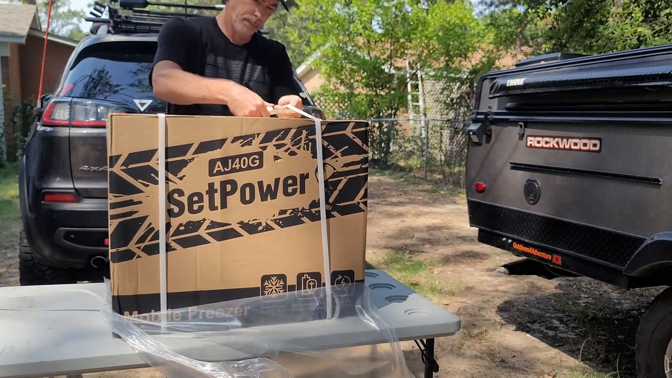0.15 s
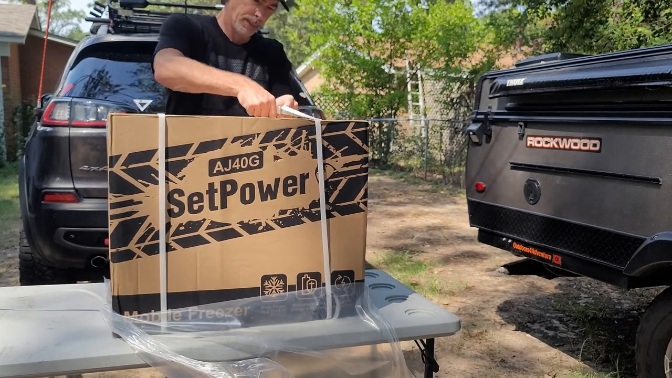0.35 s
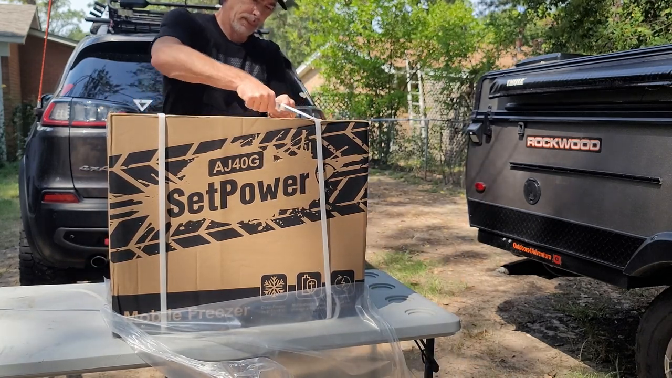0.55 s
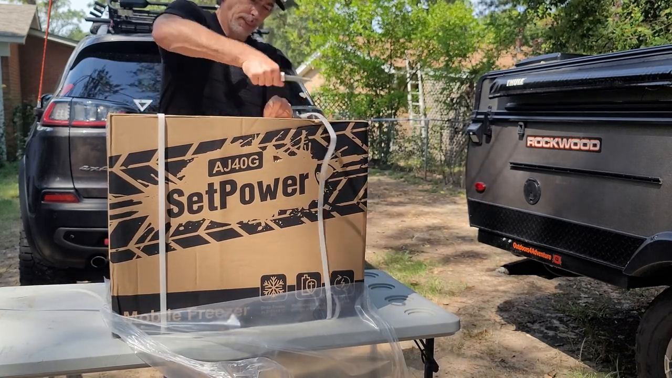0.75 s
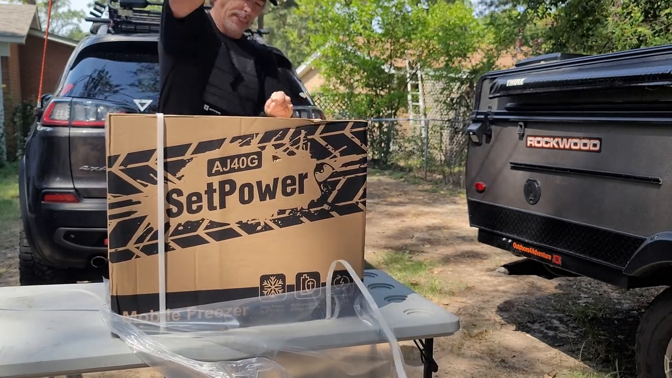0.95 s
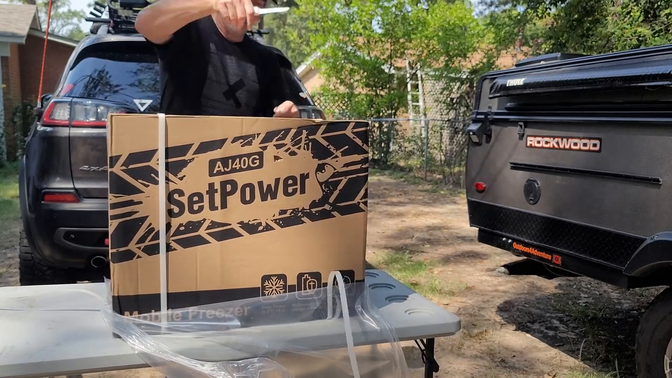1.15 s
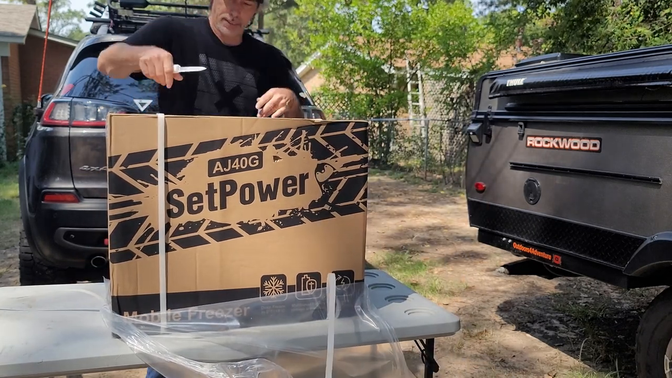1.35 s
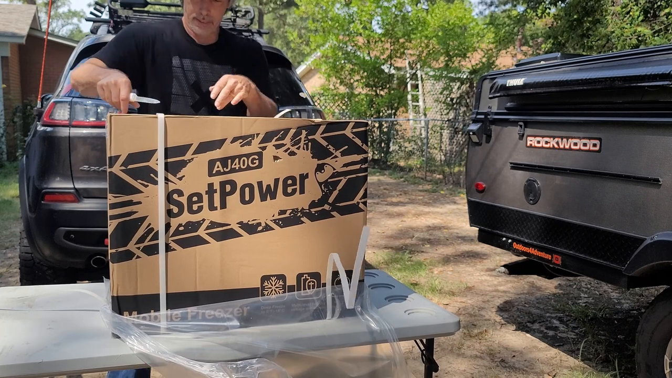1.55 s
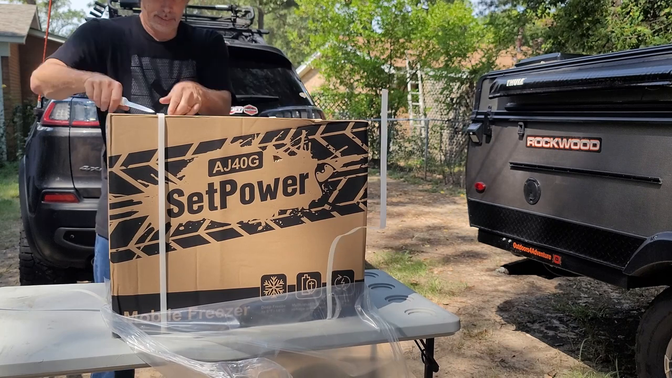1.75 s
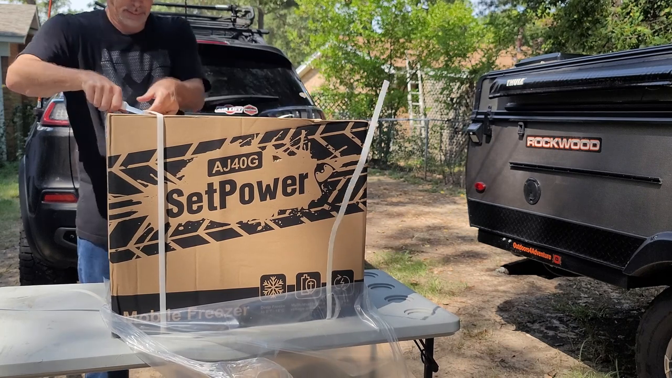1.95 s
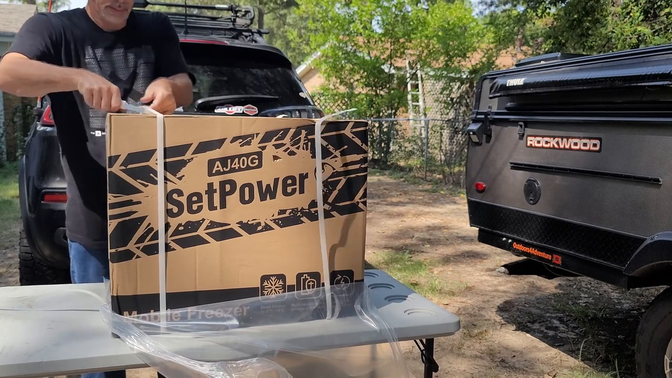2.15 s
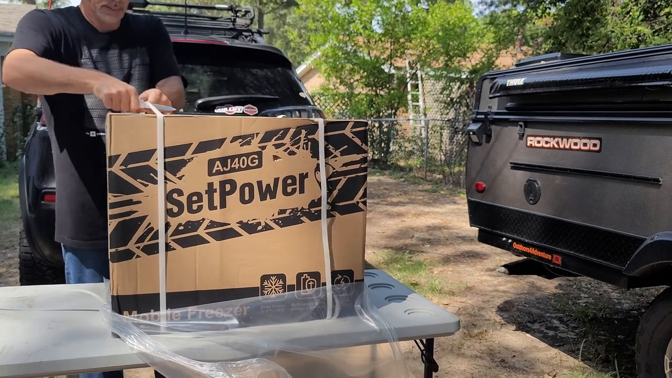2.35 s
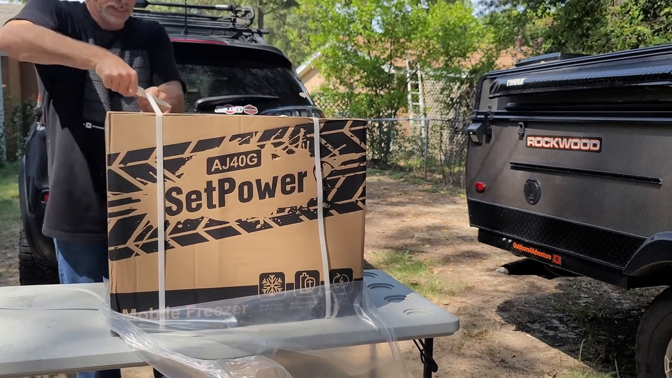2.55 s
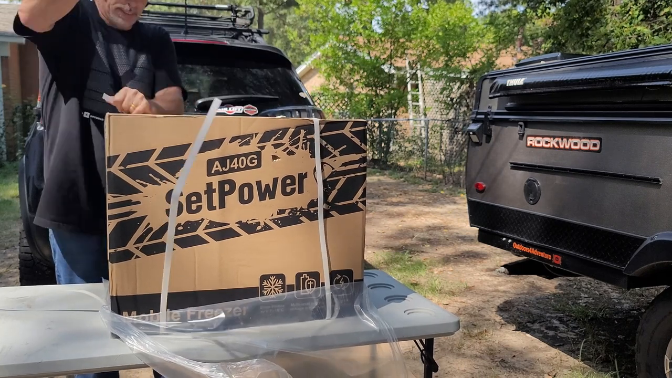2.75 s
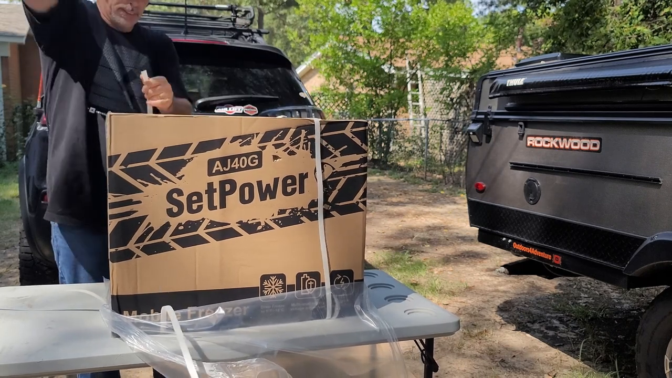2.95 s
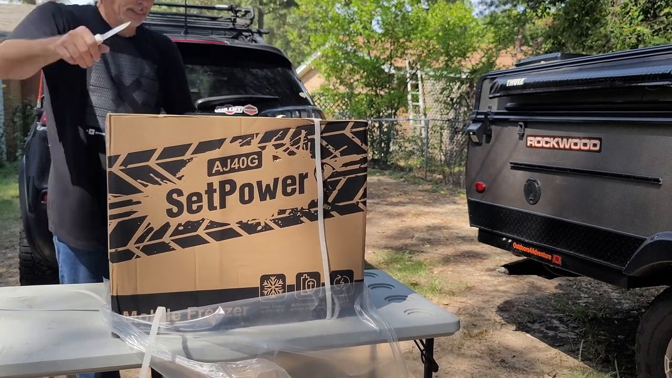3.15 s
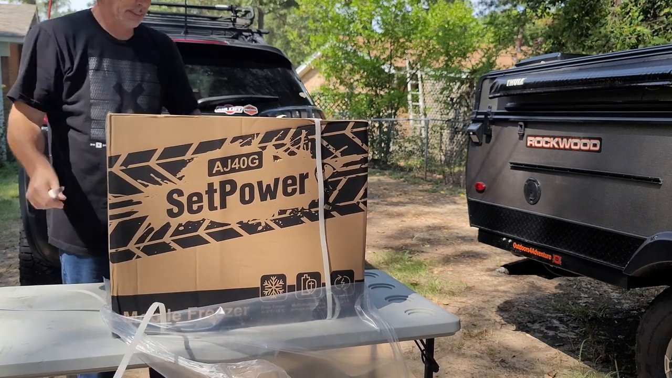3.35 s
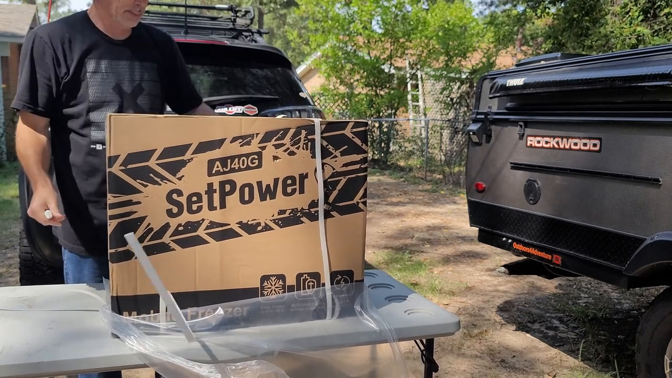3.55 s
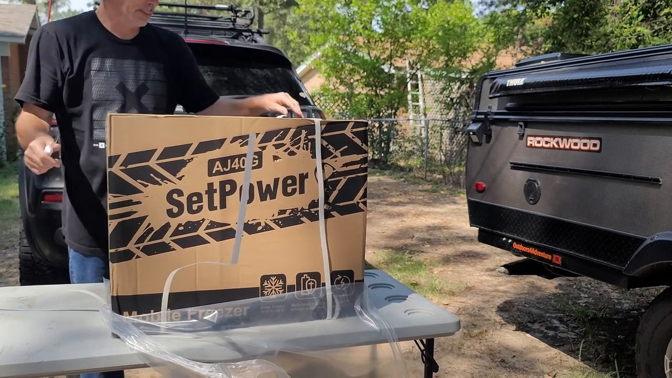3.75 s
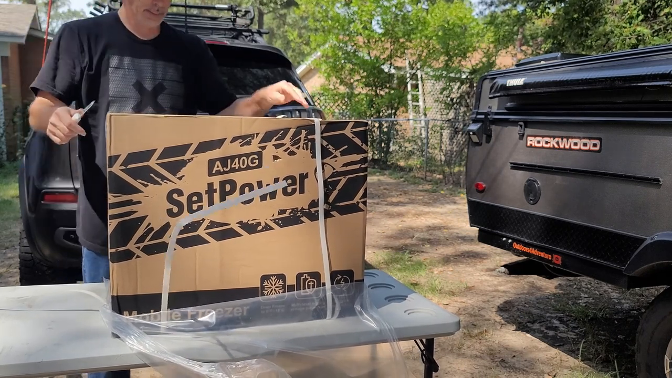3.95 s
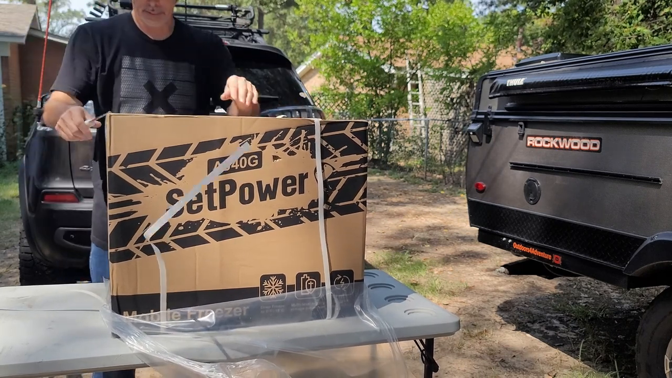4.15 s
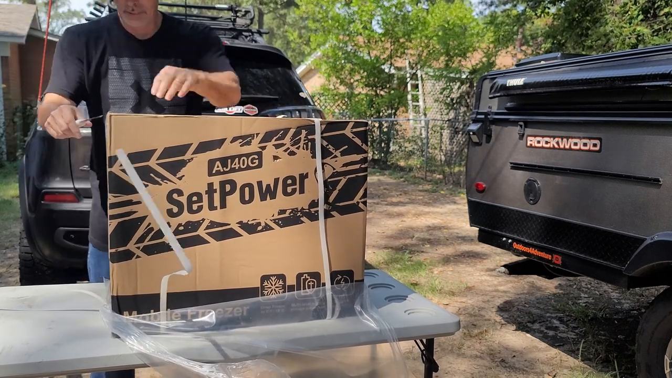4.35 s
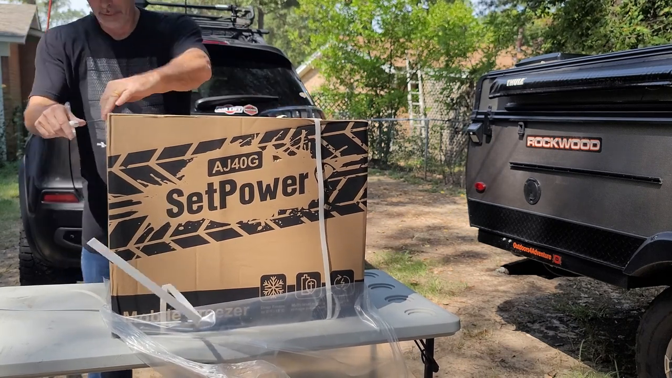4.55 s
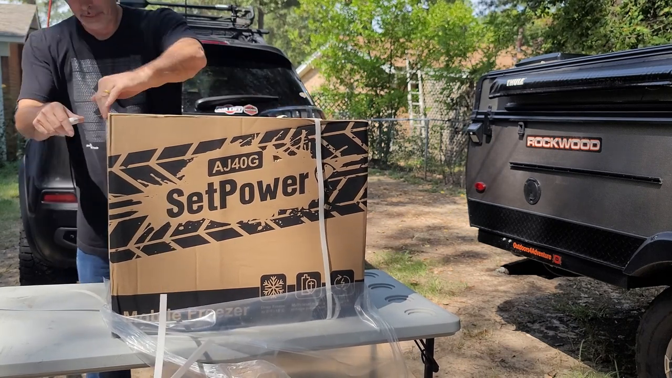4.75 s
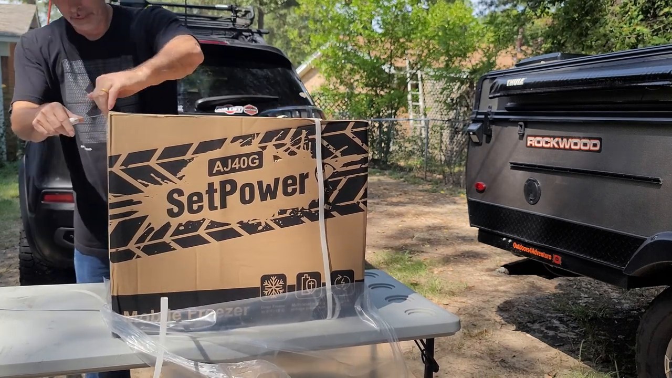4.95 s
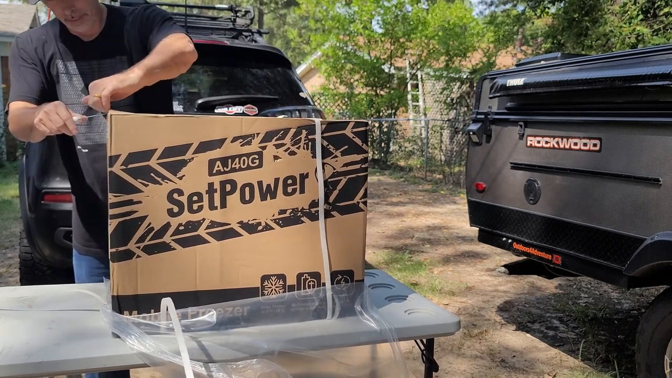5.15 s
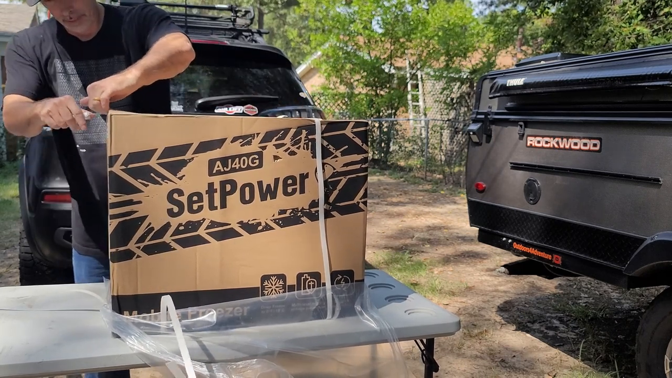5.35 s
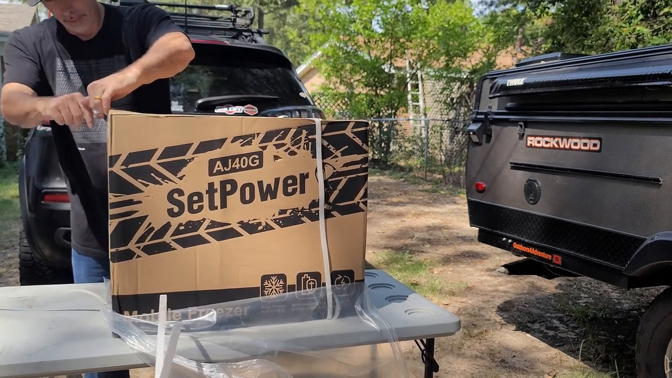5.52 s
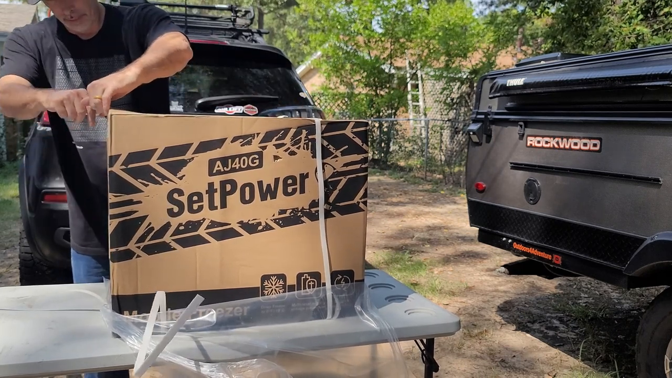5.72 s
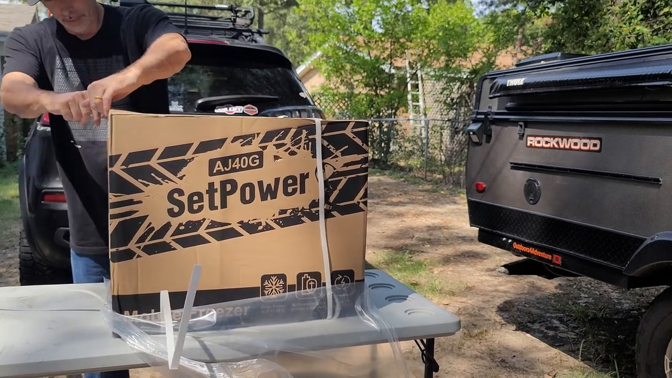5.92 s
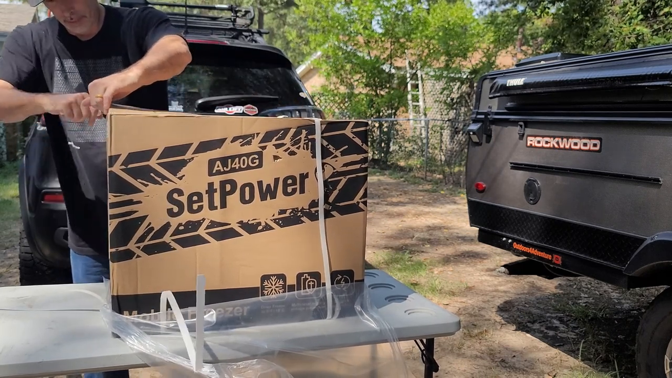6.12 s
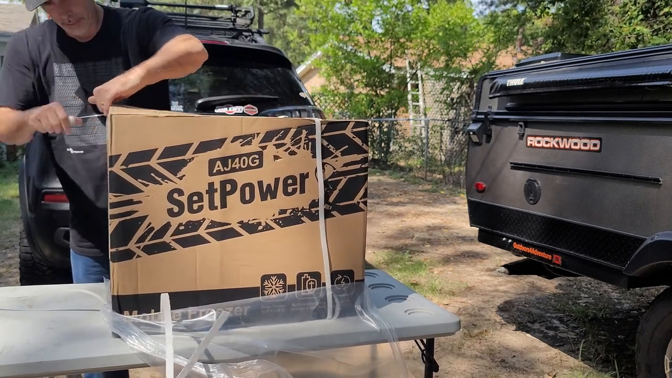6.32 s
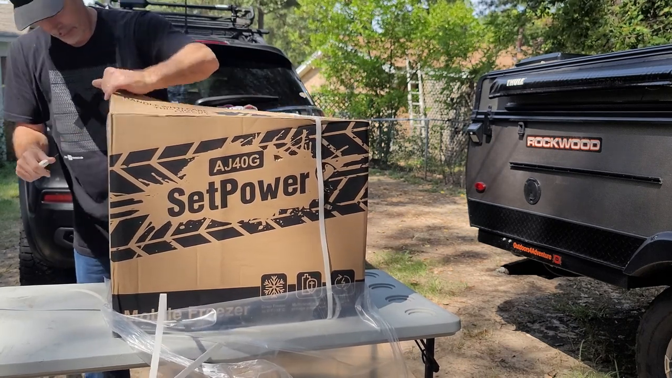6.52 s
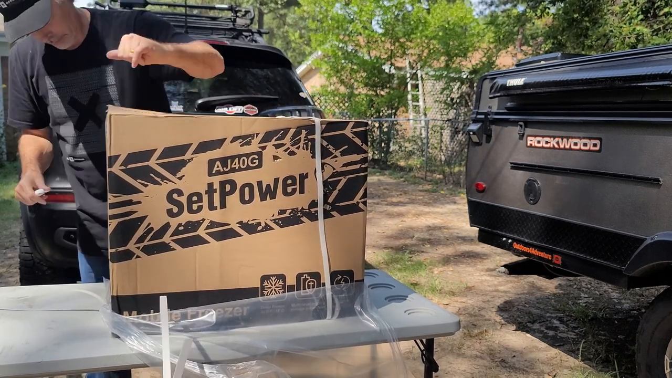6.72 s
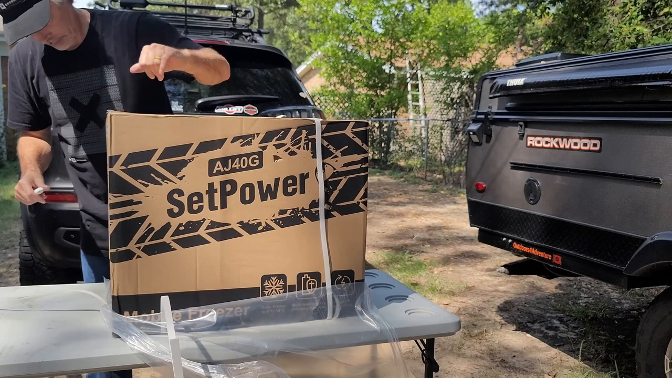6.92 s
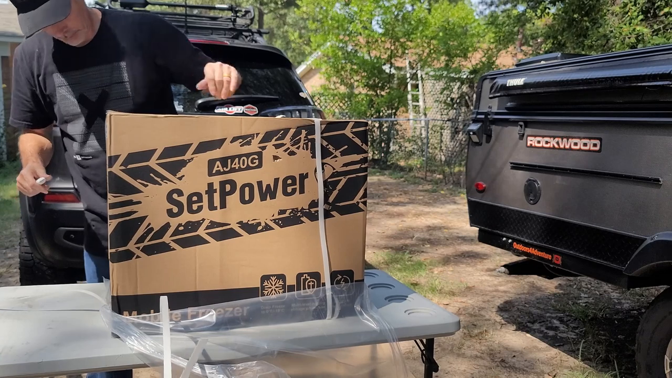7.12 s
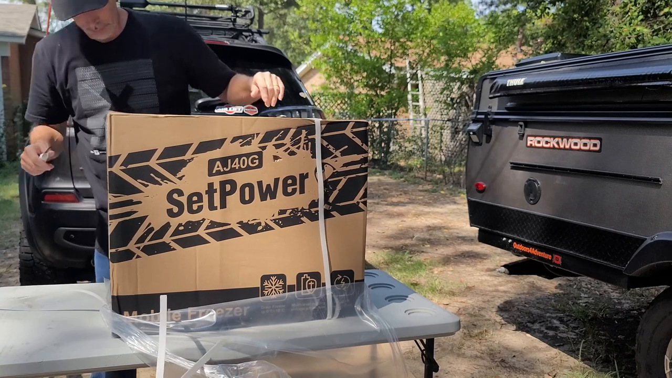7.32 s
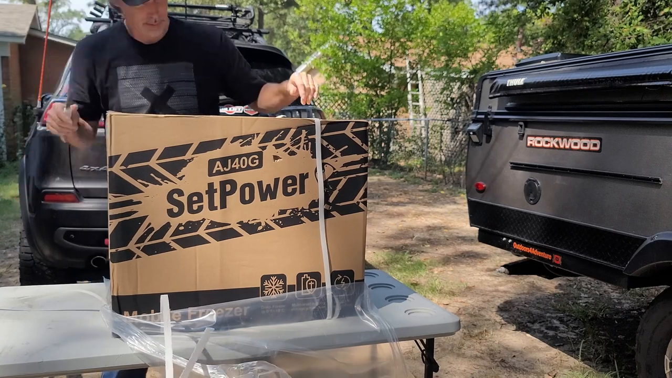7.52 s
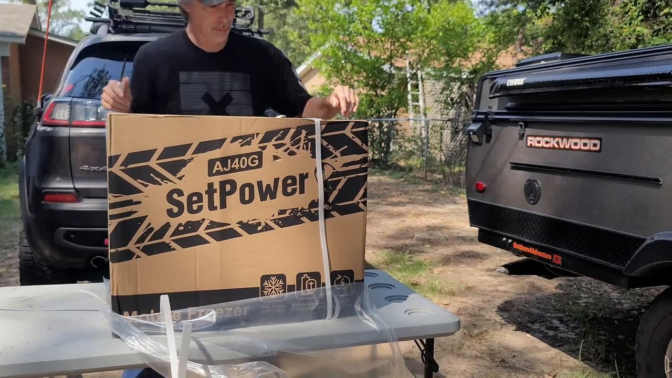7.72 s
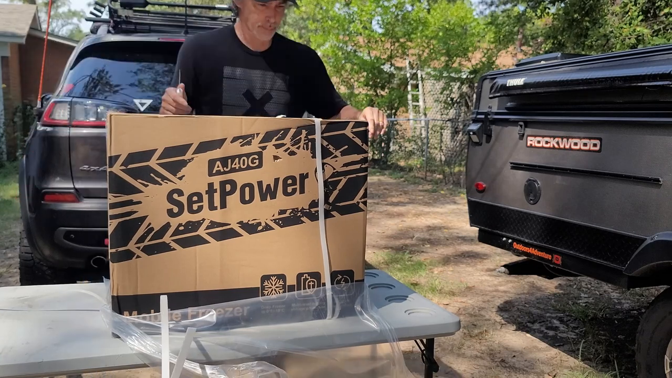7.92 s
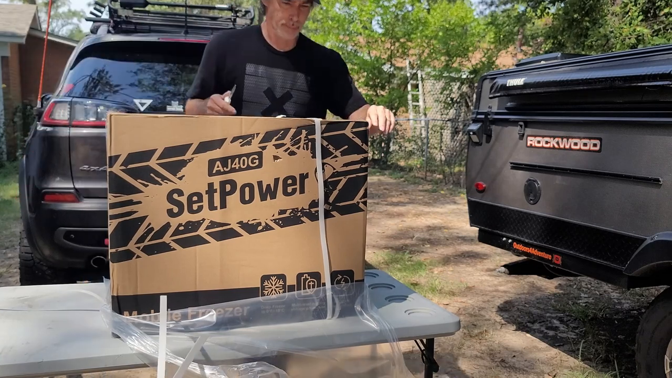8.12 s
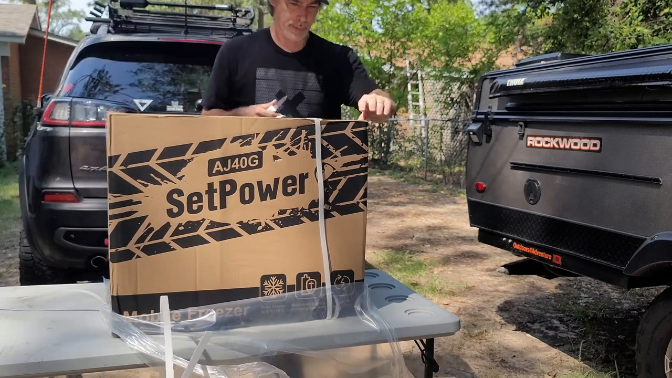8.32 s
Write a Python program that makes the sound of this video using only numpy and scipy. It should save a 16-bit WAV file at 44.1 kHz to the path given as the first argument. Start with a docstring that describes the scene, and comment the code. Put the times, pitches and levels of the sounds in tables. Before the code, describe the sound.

Close stereo view of a box in a wooded yard: knife clicks, a loud plastic crack with fluttering slaps on cardboard, sliding scrapes, then an even harder crack. A quiet stretch of light swishing leads to a dragged strap's short groan, rapid knocks and a low thump as the box rocks. Soft handling ends it. A steady beating motor hum and sparse bird chirps lie behind, with faint scattered echoes.

```python
"""A wooded yard, where two taut plastic straps are cut off a cardboard box on a table.
The knife nicks each strap; it snaps as a burst of noise and whips the box in slaps that ring panel modes.
Later the loose strap is dragged, as scraping noise and a stick-slip groan, and tugged free; the box rocks.
Two distant motors hum as wavering sines that beat together, over filtered noise for rumble and leaf hiss.
Small birds call from the trees as gliding sines, and scattered echoes fill the yard."""
import sys
import numpy as np
from scipy import signal
from scipy.fft import rfft, irfft
from scipy.io import wavfile
from scipy.ndimage import uniform_filter1d

SR = 44100
rng = np.random.default_rng(int(sys.argv[2]) if len(sys.argv) > 2 else 0)


def put_to_file(sound):
    """Save the sound as 16-bit audio at rate SR, in the file named by the first command-line argument."""
    columns = np.atleast_2d(sound).T  # one column per channel
    safe = np.clip(columns, -1, 1)
    whole_steps = np.round(safe * 32767)
    wavfile.write(sys.argv[1], SR, whole_steps.astype(np.int16))


N = 373835
# Source levels below are set before the mix, where scene() tips the box 1 dB toward the right
# and lifts the birds 2 dB.


def amp(db):
    """Decibels to gain."""
    return 10 ** (np.asarray(db) / 20)


def evened(x):
    """Scales to rms 1."""
    return x / np.sqrt(np.mean(x ** 2) + 1e-20)


def read(points, hz):
    """Reads a table on a log-frequency axis."""
    f, value = np.transpose(points)
    return np.interp(np.log(hz + 1), np.log(f + 1), value)


def add(mix, s, sound):
    """Adds a sound into the mix at time s."""
    part = mix[:, max(round(s * SR), 0):][:, :sound.shape[-1]]
    part += sound[..., :part.shape[1]]


def coloured(x, spectrum, tilt_db=0):
    """Minimum-phase filter of unit energy with the given spectrum, tilted per octave about 3.7 kHz."""
    hz = np.fft.rfftfreq(2048, 1 / SR)
    log_gain = np.log(amp(read(spectrum, hz) + tilt_db * np.log2((hz + 300) / 4000)))
    mirrored = np.r_[log_gain, log_gain[-2:0:-1]]
    # the Hilbert transform supplies the phase that makes the filter causal
    response = np.exp(np.conj(signal.hilbert(mirrored)))
    taps = np.fft.ifft(response).real
    taps /= np.linalg.norm(taps)
    return signal.fftconvolve(x, taps[None], axes=1)[:, :x.shape[1]]


def ports(size, apart):
    """Noise at two microphone ports; apart is how much each hears on its own."""
    z = rng.standard_normal((3, size))
    return (z[0] + apart * z[1:]) / np.hypot(1, apart)


def placed(pair, lead_ms):
    """The sound reaches the left port earlier than the right; a negative lead puts the right first."""
    size = pair.shape[1]
    turn = np.exp(-2j * np.pi * np.fft.rfftfreq(size, 1 / SR) * lead_ms / 1000)
    return np.array([pair[0], irfft(rfft(pair[1]) * turn, size)])


def drift(size, rate_hz):
    """Smooth chance of rms 1, made of random points joined by straight lines."""
    knots = rng.standard_normal(size // 8 + 2)
    return np.interp(np.arange(size) * rate_hz / SR, np.arange(len(knots)), knots) * np.sqrt(3 / 2)


# Colour of the yard's air: f/Hz, relative level/dB per Hz
AIR_SPECTRUM = [(12, -24), (33, -3), (70, 3.5), (180, -4.5), (280, -13.5), (500, -21.5), (950, -22.5),
                (1400, -29.5), (4400, -33.5), (5500, -38.5), (7000, -39.5), (8000, -51.5), (10000, -56.5),
                (15000, -51)]
# Left-right likeness of the air: f/Hz, correlation [-1 to 1]
AIR_LIKENESS = [(60, 0.93), (130, 0.9), (290, .78), (640, -0.05), (1400, -.15), (3000, 0.2), (15000, -0.16)]
AIR_DB = -67  # rms of the left-right average between 500 and 6000 Hz


def air(patch_db=2.0, swell_db=0.07):
    """Far rumble and leaf hiss: noise shaped by spectrum, drifting in patches of time and pitch."""
    frames, hz = N // 512 + 5, np.fft.rfftfreq(2048, 1 / SR)
    a, b, c, d, patches = rng.standard_normal((frames, len(hz), 5)).T
    patches = uniform_filter1d(patches, size=16, axis=0)
    patches = evened(uniform_filter1d(patches, size=10, axis=1))
    same = np.clip(read(AIR_LIKENESS, hz), -1, 1)[:, None]
    left, other = a + 1j * b, c + 1j * d
    right_gain = amp(read([(100, 0.3), (700, 3.1), (8000, 1.6), (15000, 0.27)], hz))[:, None]
    right = right_gain * (same * left + np.sqrt(1 - same ** 2) * other)
    swell = swell_db * drift(N + SR, rate_hz=3)[::512][:frames]
    z = np.array([left, right]) * amp(read(AIR_SPECTRUM, hz)[:, None] + patch_db * patches + swell)
    noise = signal.istft(z, nperseg=2048, noverlap=1536)[1][:, :N]
    band = signal.butter(4, [500, 6000], "band", fs=SR, output="sos")
    middle = signal.sosfilt(band, noise.mean(0))
    return amp(AIR_DB) * noise / middle.std()


# Tones of the two motors: f/Hz
MOTOR_TONES = [55.7, 109.16, 120.01, 179.2, 240.02, 327.46, 409.3]
# Strength of each tone before its waver: level/dB rms
MOTOR_LEVELS = [-62.5, -53.5, -56.5, -75, -77, -90.5, -73.5]


def hum(waver_db=2.23, wander_rad=0.054):
    """Two distant motors as wavering sines; their strongest tones beat about eleven times a second."""
    t = np.arange(N) / SR
    total = 0
    for hz, db in zip(MOTOR_TONES, MOTOR_LEVELS):
        level = amp(db + waver_db * drift(N, rate_hz=7.1))
        phase = 2 * np.pi * hz * t + wander_rad * drift(N, rate_hz=3.5)
        total = total + level * np.cos(phase)
    return np.sqrt(2) * total


# Colour of the echoes: f/Hz, relative level/dB
ECHO_SPECTRUM = [(60, -14.5), (250, 4.5), (600, -5.5), (2000, -0.5), (5000, 0), (9000, 8), (16000, -7)]
# How long each band of echo takes to fall 60 dB: f/Hz, t60/s
ECHO_DECAY = [(100, 0.99), (600, .58), (3000, 0.69), (6000, 0.55), (15000, 0.3)]


def yard(x):
    """Scattered echoes from trunks, fence and vehicles, each band dying at its own speed."""
    taps = rng.standard_normal((2, SR)) * (rng.random((2, SR)) < .12)
    hz, t, z = signal.stft(taps, SR, nperseg=256)
    fall_db = 60 * t / read(ECHO_DECAY, hz)[:, None]
    rise = np.clip(t / 0.0035, 0, 1)
    z *= amp(read(ECHO_SPECTRUM, hz)[:, None] - fall_db) * rise
    tail = signal.istft(z, SR, nperseg=256)[1]
    return signal.fftconvolve(x, tail / np.linalg.norm(tail[0]), axes=1)[:, :N]


# Falling bird calls: t/s, level/dB, stretch [factor on the glide's times]
CALLS = [(2.108, -49, 1.0), (2.450, -56, 0.94), (7.640, -53.5, 1.5), (7.986, -56, 1.0), (8.298, -59, 1.0)]
# Glide of one unstretched call: t/s after its start, f/Hz, relative level/dB
CALL_GLIDE = [(0, 2930, -9), (.009, 3260, -8), (.016, 3245, -1), (.025, 2760, -1), (.038, 2250, -3),
              (.052, 1950, -14)]
# Clear whistles of other birds: t/s, length/s, starting f/Hz, level/dB
CLEAR_WHISTLES = [(1.774, .07, 6950, -77), (3.801, 0.031, 3660, -68), (4.073, 0.03, 3670, -73),
                  (4.62, .05, 2840, -71), (5.748, .38, 3730, -73.5), (6.873, 0.061, 3120, -68),
                  (7.009, 0.064, 6900, -75.5)]
WHISTLE_SAG = .025  # share of its pitch that a whistle loses
# fainter whistles at random times and pitches
CHIRPS_PER_S, CHIRP_S, CHIRP_DB, CHIRP_HZ = 1.0, .05, -76, (2800, 3770)


def birds(rasp=0.07, waver=0.01):
    """Raspy falling calls from the right, and thin far whistles: sines whose pitch glides and trembles."""
    out, t = np.zeros((2, N)), np.arange(4096) / SR
    when, hz, db = np.transpose(CALL_GLIDE)
    for s, call_db, stretch in CALLS:
        pitch = np.interp(t / stretch, when, hz) * (1 + rasp * drift(len(t), rate_hz=1000))
        level = amp(call_db + np.interp(t / stretch, when, db, right=-90))
        call = level * np.sin(2 * np.pi * np.cumsum(pitch) / SR)
        add(out, s, placed(np.array([amp(-3.0) * call, call]), lead_ms=-0.34))
    chirps = []
    for at, high in rng.random((round(CHIRPS_PER_S * N / SR), 2)):
        chirps.append((at * N / SR, CHIRP_S, np.interp(high, [0, 1], CHIRP_HZ), CHIRP_DB))
    t = np.arange(SR // 2) / SR
    for s, length, start_hz, level_db in CLEAR_WHISTLES + chirps:
        along = np.clip(t / length, 0, 1)
        pitch = start_hz * (1 - WHISTLE_SAG * along) * (1 + waver * drift(len(t), rate_hz=610))
        level = amp(level_db + 3.3 * drift(len(t), rate_hz=22)) * np.sin(np.pi * along)
        add(out, s, level * np.sin(2 * np.pi * np.cumsum(pitch) / SR))
    return out


# Strokes of knife, hand and strap over cardboard:
# t/s, length/s, scrape level/dB, swish level/dB, scrape brightness/dB per octave
STROKES = [(0.863, 0.13, -57.5, -59.5, -4.5), (1.714, 0.56, -57, -67, -3), (2.252, 0.21, -55, -68, -2.5),
           (2.869, 0.2, -54.5, -67.5, -3.5), (4.216, .11, -60.5, -75, 1.5), (4.951, 0.29, -69.5, -73, 1.5),
           (5.346, 0.43, -65.5, -70.5, 2), (6.05, .21, -51, -63.5, -9), (6.234, 0.28, -69, -66, 15),
           (6.559, .17, -47, -54.5, -2.5), (6.689, 0.19, -52, -64, -3.5), (7.853, .4, -73, -77, -5),
           (8.367, 0.32, -61, -88, -6)]
# Hollow scrape of the cardboard: f/Hz, relative level/dB per Hz
SCRAPE_SPECTRUM = [(60, -12.5), (240, 2), (400, 0), (550, 4), (900, -4), (1500, -6), (2200, -4.5),
                   (4500, -8), (8000, -29), (16000, -34.5)]
# Swish of the ribbed plastic: f/Hz, relative level/dB per Hz
SWISH_SPECTRUM = [(300, -19.5), (1200, -2), (2300, -13.5), (4200, 9.5), (6500, -0.5), (8000, -10),
                  (10000, -14), (13000, -6), (16000, -21)]
# a stroke catches and taps the cardboard; level is against the scrape setting
CATCHES_PER_S, CATCH_DB, CATCH_HZ, CATCH_DECAY_S = 13, 3.5, (450, 1400), .006


def rubbing(catch_db=2.0, grain_db=3.0):
    """Sliding catches and slips: hollow scrape and taps from cardboard, swish from ribbed plastic."""
    out, t = np.zeros((2, N)), np.arange(SR // 2 + 2048) / SR
    for s, length, scrape_db, swish_db, bright_db in STROKES:
        catches = catch_db * drift(len(t), rate_hz=150)
        grain = grain_db * drift(len(t), rate_hz=1600)
        slips = evened(amp(np.minimum(catches + grain, 7)))
        pressure = np.sin(np.pi * np.clip(t / length, 0, 1))
        stroke = slips * pressure
        scrape = coloured(ports(len(t), apart=.4) * stroke, SCRAPE_SPECTRUM, bright_db)
        swish = coloured(ports(len(t), apart=1.0) * stroke, SWISH_SPECTRUM)
        add(out, s, placed(amp(scrape_db) * scrape + amp(swish_db) * swish, lead_ms=.12))
        for at, high in rng.random((round(CATCHES_PER_S * length), 2)):
            tap_hz = np.interp(high, [0, 1], CATCH_HZ)
            tap = np.sin(2 * np.pi * tap_hz * t) * np.exp(-t / CATCH_DECAY_S)
            add(out, s + at * length, amp(scrape_db + CATCH_DB) * np.sin(np.pi * at) * tap)
    return out


# The strap groans as it is dragged over the box edge: t/s, slip rate f/Hz, level/dB
GROAN_PATH = [(6.109, 305, -54), (6.135, 330, -51.5), (6.165, 310, -46), (6.194, 235, -64),
              (6.235, 190, -63)]
# The cardboard that it shakes: f/Hz, relative level/dB
GROAN_SPECTRUM = [(100, -13), (300, 7), (450, -3), (610, 5), (800, -22), (1050, -15), (1500, -33),
                  (4000, -33)]


def groan(jitter=0.074):
    """Nearly regular stick and slip pulses, built of nine harmonics, shake the cardboard."""
    when, rate, db = np.transpose(GROAN_PATH)
    t = np.arange(when[0], when[-1], 1 / SR)
    slip_hz = np.interp(t, when, rate) * (1 + jitter * drift(len(t), rate_hz=300))
    turns = np.cumsum(slip_hz) / SR
    slips = sum(np.cos(2 * np.pi * k * turns) for k in range(1, 10))
    body = evened(coloured(slips[None], GROAN_SPECTRUM))
    out = np.zeros((2, N))
    add(out, when[0], amp(np.interp(t, when, db)) * body)
    return out


# Ringing modes of the cardboard panels: f/Hz, relative level/dB, t60/s
PANEL_MODES = [(183.6, -8, .14), (240, 1.5, 0.043), (333, -13, 0.078), (397, -7, .12), (517, -26, .09),
               (600, -12, .12), (673.6, -7.5, 0.066), (818, -14.5, 0.1), (1010, -19, 0.11),
               (1200, -14.5, .08), (1450, -11, .08), (1990, -14.5, .07)]
# Colour of breaking plastic: f/Hz, relative level/dB per Hz
CRACK_SPECTRUM = [(200, -25.5), (700, 0.5), (1300, -1.5), (2000, -0.5), (3400, -2.5), (4700, 0),
                  (6000, -7.5), (7500, -14), (10500, -14.5), (12500, -12), (16000, -14)]
# Colour of the blow on cardboard: f/Hz, relative level/dB per Hz
KNOCK_SPECTRUM = [(40, -11.5), (130, -18.5), (230, 3.5), (400, 6.5), (600, 1), (1000, -5.5), (1500, -18.5),
                  (2500, -37.5), (8000, -61)]
# the strap rings this many times as long as the crack that starts it, up to a limit
RING_LASTS, RING_MAX_S = 1.45, 0.0038


def crack(crack_db, knock_db, decay, bright_db, strap_hz, strap_db, lead_ms, spike=2.5, rattle_db=-21,
          rattle_s=0.023, knock_s=.006, ring_db=-6, boom_db=-17, boom_s=0.029):
    """A sharp break sprays tearing fibres and rings the strap; the blow knocks and rings the panels."""
    t = np.arange(8192) / SR
    fibres = ports(len(t), apart=1.0) * evened(amp(2.6 * drift(len(t), rate_hz=1500)))
    fibres *= np.exp(-t / max(decay, 1 / SR)) + amp(rattle_db) * np.exp(-t / rattle_s)
    fibres[:, 0] += spike
    strap_turns = strap_hz * np.cumsum(1 + 0.073 * drift(len(t), rate_hz=1100)) / SR
    strap_fade = np.exp(-t / np.clip(RING_LASTS * decay, 1 / SR, RING_MAX_S))
    twang = amp(strap_db) * strap_fade * np.sin(2 * np.pi * strap_turns)
    crush = ports(len(t), apart=.2) * (np.exp(-t / knock_s) + amp(boom_db) * np.exp(-t / boom_s))
    # each blow drives every panel mode in or out by chance
    signs = rng.choice([-1, 1], len(PANEL_MODES))
    ring = 0
    for (hz, db, t60), sign in zip(PANEL_MODES, signs):
        ring = ring + sign * amp(db - 60 * t / t60) * np.sin(2 * np.pi * hz * t)
    knock = amp(-5.5) * coloured(crush, KNOCK_SPECTRUM) + amp(ring_db) * ring
    snap = amp(crack_db) * coloured(fibres, CRACK_SPECTRUM, bright_db)
    return placed(snap + twang + amp(knock_db) * knock, lead_ms)


# The work moves from the strap nearly straight ahead to the left one: t/s, left lead/ms
WORK_PLACE = [(2.35, .04), (2.7, 0.15)]


def contact(s, crack_db, knock_db, decay, bright_db, strap_hz, strap_db):
    """Time and sound of one crack, coming from where the hands work."""
    lead_ms = np.interp(s, *np.transpose(WORK_PLACE))
    return s, crack(crack_db, knock_db, decay, bright_db, strap_hz, strap_db, lead_ms)


# Plastic clicks as the knife bites or the strap catches: t/s, level/dB, decay/s, strap ring f/Hz
PLASTIC_CLICKS = [(0.7604, -41, 0.0038, 2150), (0.7673, -31.5, 0.002, 1760), (.9220, -41.5, 0.0013, 3320),
                  (2.010, -53.5, 0.002, 800), (2.336, -40, 0.0024, 5640), (2.3428, -44.5, 0.0034, 2790),
                  (2.7147, -58, 0.0088, 1200), (2.733, -50, 0.0067, 1250), (2.997, -63, 0.0098, 2920),
                  (5.098, -56.5, 0.0024, 4860), (5.397, -59.5, 0.021, 4180), (5.769, -45, 0.0069, 1950),
                  (6.052, -50, 0.045, 2770), (6.5301, -30, 0.002, 5240), (6.548, -38.5, .002, 2170),
                  (6.594, -30, .0025, 1370), (7.987, -62, .005, 7300)]
CLICK_KNOCK_DB, CLICK_RING_DB = -7.5, 3  # cardboard and strap ring against the click
# Strap and hand strike the cardboard:
# t/s, knock level/dB, crack level/dB, crack decay/s, strap ring f/Hz
CARDBOARD_KNOCKS = [(.806, -32.5, -51, .006, 1300), (1.768, -46, -61, 0.0057, 515),
                    (2.3203, -41, -43, 0.0032, 1300), (2.7140, -44.5, -50, .004, 1100),
                    (2.7328, -34.5, -46, 0.0084, 1300), (2.7863, -23.5, -28.5, 0.0043, 600),
                    (2.957, -45.5, -55, 0.0051, 550), (6.056, -32.5, -43.5, .008, 1420),
                    (6.0895, -34.5, -38, 0.0047, 600), (6.538, -38, -44, 0.0039, 1990),
                    (6.6030, -41, -40.5, 0.0085, 1440), (6.640, -30.5, -34, 0.0028, 970),
                    (6.71, -30.5, -41, .0047, 685), (6.7171, -29.5, -32, 0.0019, 887),
                    (6.753, -43.5, -48, .009, 1790), (6.816, -48, -61, 0.0047, 1510),
                    (7.903, -51, -63.5, 0.0059, 645)]
# The box jumps or rocks on the table: t/s, level/dB, f/Hz, decay/s
BOX_THUMPS = [(0.8197, -32.5, 79.4, 0.028), (2.758, -29, 80, 0.024), (6.094, -33, 171, 0.016),
              (6.7241, -32.5, 191, 0.018), (6.7343, -26.5, 66, 0.018)]
CLICK_TILT_DB, KNOCK_TILT_DB = 1.5, -1  # brightness per octave


def box():
    """Clicks of the plastic, knocks on the cardboard, and low decaying sines as the whole box thumps."""
    out, t = np.zeros((2, N)), np.arange(SR // 4) / SR
    for s, db, decay, hz in PLASTIC_CLICKS:
        add(out, *contact(s, db, db + CLICK_KNOCK_DB, decay, CLICK_TILT_DB, hz, db + CLICK_RING_DB))
    for s, db, crack_db, decay, hz in CARDBOARD_KNOCKS:
        # the strap ring takes the knock's own level setting
        add(out, *contact(s, crack_db, db, decay, KNOCK_TILT_DB, hz, strap_db=db))
    for s, db, hz, decay in BOX_THUMPS:
        add(out, s, -amp(db) * np.sin(2 * np.pi * hz * t) * np.exp(-t / decay))
    return out


# A strap parts: t/s, crack level/dB, cardboard knock level/dB, fading of its slaps/dB per s,
# strap ring f/Hz, ring level/dB above the crack
STRAP_SNAPS = [(0.8211, -21, -19.5, 375, 1400, -6.5), (2.7549, -14, -17, 1152.5, 957, -4)]
# the freed ends slap the box at widening gaps; the cardboard's share fades faster than the crack
SLAP_GAP_S, SLAP_GAP_GROWTH, SLAP_DECAY_S, SLAP_TILT_DB = .0036, 1.33, 0.0039, -1
SLAP_KNOCK_FADE = 1.44  # times the crack's fading
# the last fibres give way just before the snap
TEAR_LEAD_S, TEAR_CRACK_DB, TEAR_KNOCK_DB, TEAR_DECAY_S, TEAR_TILT_DB = .006, -39.5, -39.5, .007, 0.5
# the tension is let go in one push of air
PUSH_DB, PUSH_S, PUSH_DELAY_S = -7.5, 0.0002, 0.00086
# the broad face of the box booms at its main panel mode
FACE_DB, FACE_HZ, FACE_DECAY_S = -25, 240, .012


def snaps(count=6, ring_spread=0.44):
    """Each strap tears, parts with a push of air, and whips the box in a fading run of slaps."""
    out, t = np.zeros((2, N)), np.arange(SR // 4) / SR
    push_rise = np.minimum(t / .00012, 1)
    push = amp(PUSH_DB) * (1 - t / PUSH_S) * np.exp(-t / PUSH_S) * push_rise
    face = amp(FACE_DB) * np.sin(2 * np.pi * FACE_HZ * t) * np.exp(-t / FACE_DECAY_S)
    gaps = SLAP_GAP_S * SLAP_GAP_GROWTH ** np.arange(count - 1)
    delays = np.r_[0, np.cumsum(gaps)]  # the first is the break itself
    for s, crack_db, knock_db, fade, ring_hz, ring_db in STRAP_SNAPS:
        add(out, *contact(s - TEAR_LEAD_S, TEAR_CRACK_DB, TEAR_KNOCK_DB, TEAR_DECAY_S, TEAR_TILT_DB,
                          ring_hz, strap_db=TEAR_CRACK_DB))
        add(out, s + PUSH_DELAY_S, push)
        add(out, s, face)
        for delay in delays:
            db = crack_db - fade * delay
            slap_knock_db = knock_db - SLAP_KNOCK_FADE * fade * delay
            # the slaps after the break ring at scattered pitches
            hz = ring_hz * np.exp(ring_spread * rng.standard_normal() * (delay > 0))
            add(out, *contact(s + delay, db, slap_knock_db, SLAP_DECAY_S, SLAP_TILT_DB, hz, db + ring_db))
    return out


def scene():
    """The steady background, the far birds and the near box, with echoes of birds and box from the yard."""
    box_balance = amp([[-.5], [.5]])  # the box is 1 dB louder at the right port than at the left
    near = (snaps() + box() + rubbing() + groan()) * box_balance
    far = birds()
    background = hum() + air()
    return near + amp(-20) * yard(near) + amp(2.0) * far + amp(1.5) * yard(far) + background


def record(dry):
    """The microphone rounds off the loudest peaks; then the band ends at 16 kHz."""
    ceiling = .7
    rounded = ceiling * np.tanh(dry / ceiling)
    low_pass = signal.firwin(401, 16000, window=("kaiser", 9), fs=SR)
    return signal.oaconvolve(rounded, low_pass[None], "same")


dry = scene()
out = record(dry)
put_to_file(out)
```